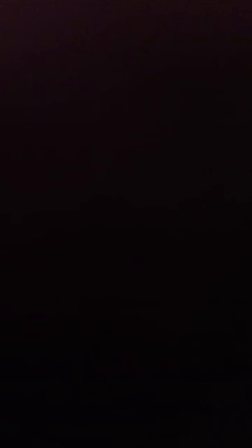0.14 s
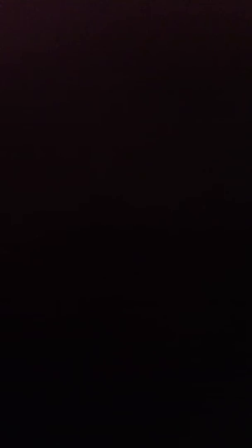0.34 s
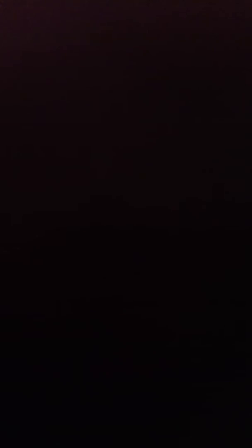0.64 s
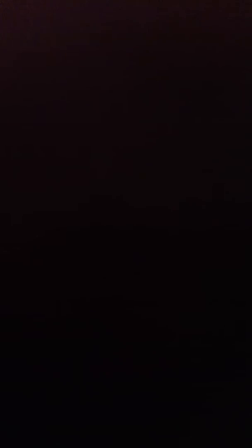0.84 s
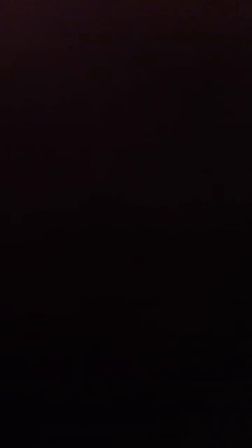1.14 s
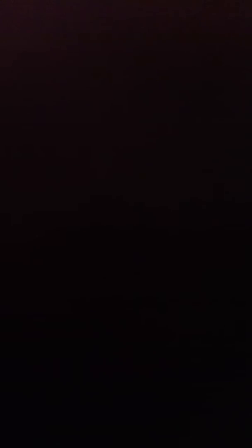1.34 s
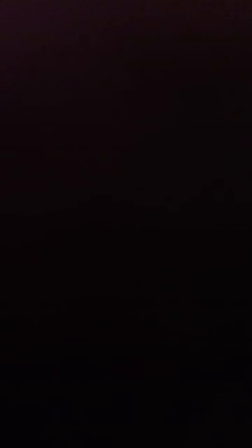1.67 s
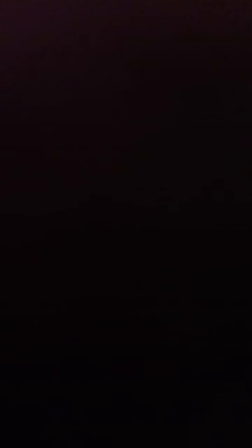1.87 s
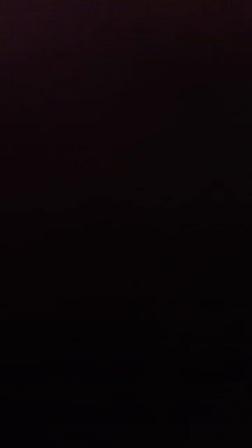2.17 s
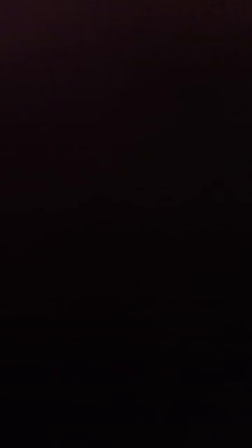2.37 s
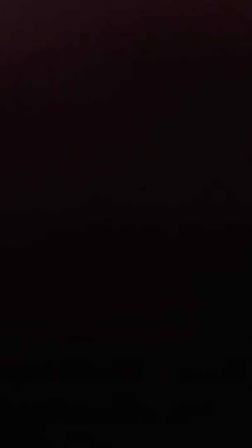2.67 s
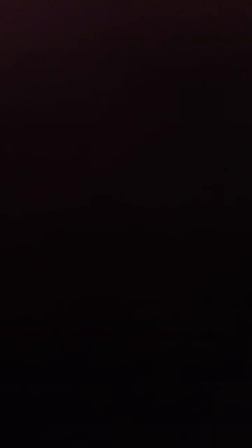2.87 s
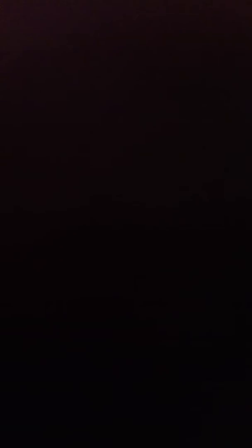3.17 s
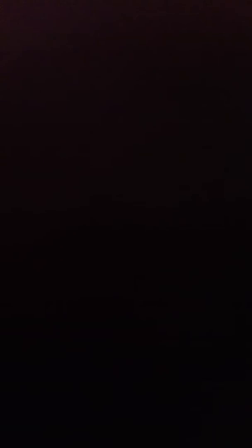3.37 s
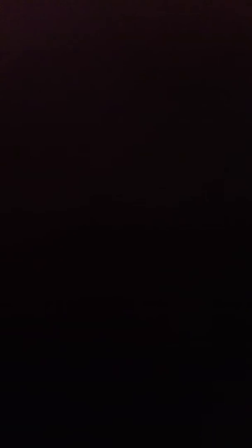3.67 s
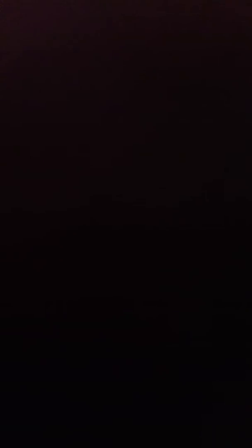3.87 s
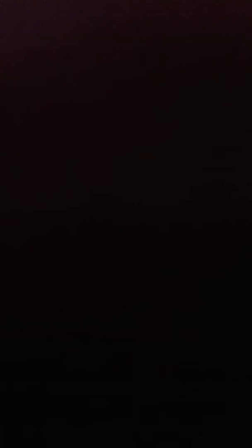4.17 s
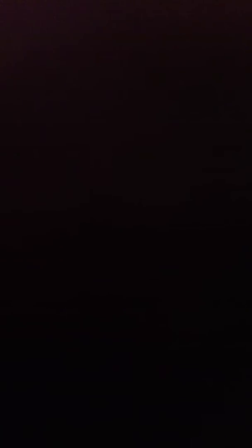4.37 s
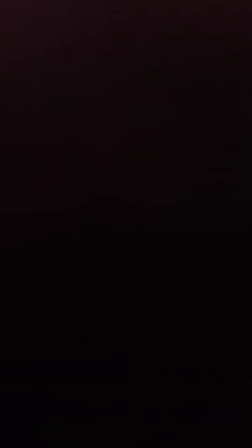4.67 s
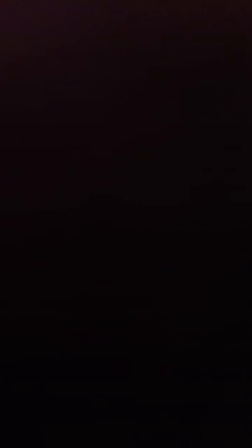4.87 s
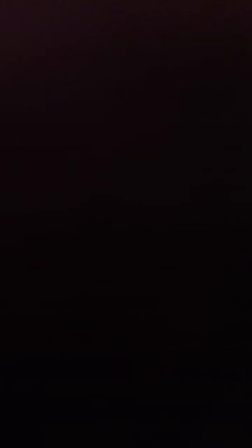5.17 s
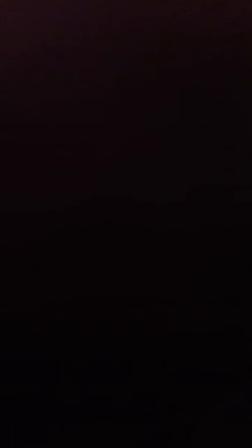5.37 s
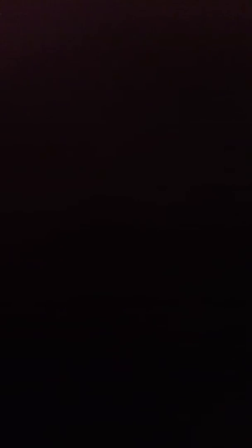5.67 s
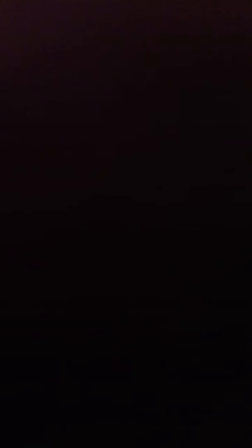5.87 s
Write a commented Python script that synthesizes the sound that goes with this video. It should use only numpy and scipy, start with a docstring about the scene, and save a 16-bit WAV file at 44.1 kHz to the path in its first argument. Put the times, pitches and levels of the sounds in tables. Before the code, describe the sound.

A hollow wooden object is handled close up: soft scuffs, one sharp knock, bumpy dragging and rasping, near quiet, then another thumping scrape fading away.

```python
"""A hollow wooden body, perhaps a drawer, is rubbed and handled close to a small microphone.
Light brushes of a hand come first, then a knock, a long dragging slide with bumps and a shorter shove.
The rub is shaped noise for the hiss, and tiny random catches that shake resonances of the body.
Bumps are brief shudders that ring the body; the knock is noise whose bands rise and decay apart.
A gliding airy hiss and a thin squeak come late; room rumble, microphone hiss and a whine lie below."""
import sys
import numpy as np
from scipy import signal
from scipy.io import wavfile
from scipy.ndimage import uniform_filter1d

SR = 44100
rng = np.random.default_rng(int(sys.argv[2]) if len(sys.argv) > 2 else 0)


def volts_from_db(level):
    """Convert decibel levels to linear amplitude ratios."""
    exponent = np.asarray(level, float) / 20
    return 10 ** exponent


def persist_wave(psi):
    """Save psi, clipped to +-1, as 16-bit WAV."""
    counts = np.round(np.clip(psi, -1, 1) * 32767).astype(np.int16)
    wavfile.write(sys.argv[1], SR, np.atleast_2d(counts).T)


N = 265482


def rms_one(x):
    """Scales to unit rms."""
    return x / np.sqrt(np.mean(x ** 2) + 1e-20)


def at_hz(points, hz):
    """Reads a table of (Hz, value) on a log-frequency axis."""
    table_hz, values = np.transpose(points)
    return np.interp(np.log(hz), np.log(table_hz), values)


def in_time(rows):
    """Columns of a curve, sample by sample; the first column is time in seconds."""
    s, *columns = np.transpose(rows)
    return [np.interp(np.arange(N) / SR, s, column) for column in columns]


def drift(rate_hz):
    """Slow chance with spread 1: noise smoothed twice."""
    r = np.exp(-2 * np.pi * rate_hz / SR)
    run_in = 9000   # samples thrown away while the filter settles
    smooth = signal.lfilter([1], [1, -2 * r, r * r], rng.standard_normal(N + run_in))
    return rms_one(smooth[run_in:])


def resonate(x, hz, width_hz):
    """One resonance with gain 1 on top."""
    r = np.exp(-np.pi * width_hz / SR)
    poles = [1, -2 * r * np.cos(2 * np.pi * hz / SR), r * r]
    return signal.lfilter([(1 - r * r) / 2, 0, (r * r - 1) / 2], poles, x + 1e-18)


# Edges of the sixth-octave bands, in Hz.
BAND_EDGES_HZ = 25 * 2 ** (np.arange(57) / 6)


def bands(gain_at):
    """Sixth-octave bands of noise, run in, each shaped by a gain that may change in time."""
    white = rng.standard_normal((2, N + SR // 2))
    out = np.zeros(N)
    for k, (low, high) in enumerate(zip(BAND_EDGES_HZ, BAND_EDGES_HZ[1:])):
        band_filter = signal.butter(2, [low, high], "band", fs=SR, output="sos")
        band = signal.sosfilt(band_filter, white[k % 2])   # neighbours use separate noises
        out += band[-N:] * gain_at(np.sqrt(low * high))
    return out


def swells(start, hold, db, rise_db_per_s, fall_db_per_s):
    """Level in dB of each event: a rise up to its start, a hold, a fall."""
    late = np.arange(N, dtype=np.float32) / SR - start[:, None]
    rise = rise_db_per_s * np.minimum(late, 0)
    fall = fall_db_per_s * np.maximum(late - hold[:, None], 0)
    return db[:, None] + rise - fall


def joined(*levels_db):
    """Level in dB of unrelated sounds heard together."""
    return 10 * np.log10(np.sum(volts_from_db(np.vstack(levels_db)) ** 2, axis=0) + 1e-20)


# Colour of the room rumble and microphone hiss. Each row: pitch in Hz, relative level in dB per Hz.
AIR_COLOUR = [(15, -61), (25, -14.5), (91, -6.5), (156, -6.5), (240, -11), (306, -8.5), (497, -16),
              (669, -20.5), (725, -21), (876, -19.5), (1060, -23), (1420, -22.5), (1630, -23.5),
              (15600, -29)]
# A faint electronic whine. Each row: pitch in Hz, level in dB.
WHINE_TONES = [(11703, -81)]


def air():
    """Room rumble and microphone hiss as steady shaped noise, and the whine as a sine."""
    whine = sum(np.sqrt(2) * volts_from_db(db) * np.sin(2 * np.pi * hz * np.arange(N) / SR)
                for hz, db in WHINE_TONES)
    noise = rms_one(bands(lambda hz: volts_from_db(at_hz(AIR_COLOUR, hz))))
    return volts_from_db(-56) * noise + whine


# Light brushes and scuffs of the hand. Each row: start in seconds (when it is at full level),
# hold in seconds, hiss in dB, weight on the body in dB, catch on the edge in dB.
HAND_BRUSHES = [(0.049, 0.047, -51.5, -51, -49), (0.17, 0.087, -60.5, -63.5, -63),
                (0.612, 0.18, -61, -61.5, -64), (1.077, 0.0078, -53.5, -50.5, -55),
                (1.174, 0.031, -53, -48, -52.5), (1.368, 0.1, -50, -49.5, -52),
                (1.613, 0.028, -59, -55, -61.5), (1.684, 0.1, -43.5, -45, -48),
                (4.09, 0.011, -58, -63, -58.5), (4.18, 0.027, -53.5, -60, -60), (4.898, .02, -49, -45, -39),
                (5.209, 0.011, -67, -47, -46.5), (5.602, 0.066, -62.5, -59.5, -62),
                (5.817, .01, -55.5, -56.5, -58.5), (5.884, .1, -68, -65, -69)]
BRUSH_RISE_DB_PER_S, BRUSH_FALL_DB_PER_S = 387, 243


def brushes():
    """Hiss, weight and edge levels of each hand brush, all with the same swell."""
    start, hold, hiss_db, weight_db, catch_db = np.transpose(HAND_BRUSHES)
    hiss = swells(start, hold, hiss_db, BRUSH_RISE_DB_PER_S, BRUSH_FALL_DB_PER_S)
    return hiss, hiss + (weight_db - hiss_db)[:, None], hiss + (catch_db - hiss_db)[:, None]


# Moments when a new push sets in at once, in seconds.
JOLTS_S = [1.9545, 3.186, 4.687, 4.785, 5.207]
# The pushes, one list for each. Each row: time in seconds, speed as hiss in dB,
# weight on the body in dB, favoured panel pitch in Hz. At a jolt, the jolt sets the time.
PUSH_CURVES = [
    [(0.0, -99, -99, 750), (1.93, -99, -99, 750)],
    [(1.97, -27.5, -30, 790), (2.02, -57, -37.5, 700), (2.07, -45.5, -39, 640), (2.13, -44, -41, 740),
     (2.264, -39, -37.5, 860), (2.42, -48, -37.5, 655), (2.57, -45, -37.5, 770), (2.664, -39, -37, 660),
     (2.704, -39.5, -32, 580), (2.84, -36, -26.5, 610), (2.91, -33.5, -29.5, 633), (2.972, -34, -25, 700),
     (3.03, -35.5, -33.5, 750), (3.08, -34.5, -38, 1000), (3.17, -38, -34.5, 920)],
    [(3.2, -36, -30, 880), (3.244, -37, -30.5, 880), (3.322, -38, -35, 810), (3.38, -33.5, -32, 985),
     (3.45, -37.5, -34.5, 863), (3.486, -37, -30.5, 835), (3.52, -38.5, -35.5, 774),
     (3.58, -35.5, -32, 930), (3.67, -36.5, -32.5, 770), (3.83, -40.5, -34, 705), (3.94, -40, -32.5, 810),
     (4.0, -47.5, -38, 825), (4.068, -54.5, -45, 630), (4.148, -73, -57, 615), (4.3, -71, -73, 613),
     (4.54, -70, -86, 670), (4.616, -68, -58, 650), (4.67, -71, -59, 620)],
    [(4.7, -57.5, -40.5, 585), (4.745, -62, -48, 590), (4.76, -51, -59, 580)],
    [(4.8, -44.5, -30, 570), (4.83, -43.5, -32.5, 710), (4.91, -38.5, -32, 810), (4.97, -41.5, -34, 672),
     (5.0, -44.5, -38, 650), (5.04, -46.5, -41, 646), (5.074, -52, -34.5, 630), (5.114, -54, -31.5, 640),
     (5.19, -56, -41.5, 700)],
    [(5.22, -58, -34.5, 706), (5.288, -84, -46, 630), (5.42, -94, -64.5, 622), (5.55, -99, -70, 646)],
]


def pushes(rise_s):
    """Joins the curves of successive pushes; each new one sets in at its jolt."""
    parts = [np.array(part, float) for part in PUSH_CURVES]
    for before, after, s in zip(parts, parts[1:], JOLTS_S):
        before[-1, 0] = s
        after[0, 0] = s + rise_s
    return in_time(np.concatenate(parts))


# Heaves that wake the low boom. Each row: start in seconds (when it is at full level),
# hold in seconds, level in dB, favoured pitch in Hz.
BOOM_HEAVES = [(0.613, .015, -54, 117), (1.657, 0.022, -49, 144), (1.803, 0.026, -56, 147),
               (1.982, 0.099, -36.5, 156), (2.137, 0.24, -43, 158), (2.38, 0.099, -41, 200),
               (2.703, 0.062, -38.5, 200), (2.79, .05, -52, 123), (2.935, 0.2, -40.5, 125),
               (3.198, 0.016, -43, 200), (3.365, 0.047, -42, 117), (3.512, 0.038, -63, 169),
               (3.81, .03, -44.5, 117), (3.93, .06, -43, 118), (4.05, 0.018, -40.5, 120),
               (4.16, 0.24, -50, 157), (4.608, 0.017, -45.5, 171), (4.716, .03, -44, 155),
               (4.786, 0.022, -29.5, 125), (4.936, .06, -31, 123), (5.063, 0.16, -41, 200),
               (5.245, 0.066, -48.5, 175), (5.46, .08, -58, 165)]


def heaves():
    """Level of each heave, and the pitch favoured by the strongest one at each moment."""
    start, hold, db, hz = np.transpose(BOOM_HEAVES)
    level_db = swells(start, hold, db, rise_db_per_s=700, fall_db_per_s=226)
    return level_db, hz[level_db.argmax(axis=0)]


def grit(per_s, spread_db):
    """Tiny random catches of a rough surface."""
    sizes = volts_from_db(spread_db * np.minimum(rng.exponential(1, N), 5)) * rng.choice([-1, 1], N)
    return sizes * (rng.random(N) < per_s / SR)


def shaken(modes, per_s, patchy_db, near_hz=None, off_db=0):
    """Catches drive all modes; each swells on its own and loses off_db an octave from near_hz."""
    force = grit(per_s, spread_db=2.5)
    out, power = 0, 0
    for k, (hz, width, db) in enumerate(modes):
        octaves_off = np.abs(np.log2(hz / near_hz)) if off_db else 0
        gain = volts_from_db(db - off_db * octaves_off)
        patches = volts_from_db(patchy_db * drift(5.7))
        out += (-1) ** k * gain * patches * resonate(force, hz, width)
        power += gain ** 2 * width
    return rms_one(out / np.sqrt(power))   # a change of pitch leaves the loudness even


# Colour of the rub's hiss. Each row: pitch in Hz, relative level in dB per Hz.
HISS_COLOUR = [(1470, -35), (2500, -3.5), (3370, -1), (3780, -2), (4330, -1), (5570, -7.5), (7170, -11.5),
               (9950, -19.5), (15500, -43)]


def surface_hiss(top_db):
    """Rasp of the surface as noise; top_db tilts it above 4500 Hz, and each band comes and goes a little."""
    def gain(hz):
        """Gain of one band in time."""
        tilt_db = (top_db + 9.5) * np.clip(np.log2(hz / 4500), 0, 1.3)
        return volts_from_db(at_hz(HISS_COLOUR, hz) + tilt_db + 0.29 * drift(15.0))
    return rms_one(bands(gain))


# Resonances of the edge. Each row: pitch in Hz, width in Hz, relative level in dB.
EDGE_MODES = [(1530, 330, -1.5), (1788, 42, 7), (1940, 57, 1.5), (2113, 67, 3), (2318, 215, -2.5),
              (2615, 71, 0), (2864, 150, -7)]


def edge():
    """Dense catches ring the edge."""
    return shaken(EDGE_MODES, per_s=6000, patchy_db=0.0)


# Resonances of the panels. Each row: pitch in Hz, width in Hz, relative level in dB.
PANEL_MODES = [(482.7, 36, -3), (534, 27, -2.5), (590, 27, -2), (620.4, 35, -3), (702, 21, -5.5),
               (767.6, 11.4, -2.5), (823, 26, -6.5), (906.5, 35.5, -3.5), (970, 91, -12.5),
               (1000.5, 11.6, -2), (1091, 40, -2), (1191, 9.8, 0), (1267, 57, -5), (1415, 44, -4),
               (1432, 34, -6)]


def panels(near_hz):
    """Catches shake the panels, most strongly near the favoured pitch."""
    return shaken(PANEL_MODES, per_s=4000, patchy_db=3.0, near_hz=near_hz, off_db=9.5)


# Resonances of the hollow. Each row: pitch in Hz, width in Hz, relative level in dB.
HOLLOW_MODES = [(279, 27.6, -6.5), (321.2, 6.2, -6), (353, 4.9, -1), (385, 16.6, -6), (417, 74, -10)]


def hollow(near_hz):
    """Sparser catches shake the hollow, most strongly near the favoured pitch."""
    return shaken(HOLLOW_MODES, per_s=2000, patchy_db=-0.34, near_hz=near_hz, off_db=9.0)


# Low resonances of the body. Each row: pitch in Hz, width in Hz, relative level in dB.
BOOM_MODES = [(108.2, 13, -2.5), (121.3, 32.7, 0), (152.3, 10.2, -1.5), (156.8, 9.2, 0), (200, 53, -4.5)]


def boom(near_hz):
    """The sparsest catches shake the low modes, with the bass below 92 Hz taken off."""
    low = shaken(BOOM_MODES, per_s=1000, patchy_db=1.0, near_hz=near_hz, off_db=21.5)
    return signal.sosfilt(signal.butter(4, 92, "high", fs=SR, output="sos"), low)


def rubbing():
    """Surface hiss, edge, panels, hollow and boom follow speed and weight of the stroke."""
    even_db = -35   # the laws below are stated for a stroke of this level
    push_db, load_db, push_hz = pushes(rise_s=0.0023)
    brush_db, touch_db, catch_db = brushes()
    heave_db, heave_hz = heaves()

    hiss_db = joined(push_db, brush_db)
    panel_db = joined(load_db, touch_db)
    speed, weight = hiss_db - even_db, panel_db - even_db
    by_hand = 1 - volts_from_db(load_db - panel_db) ** 2   # share of the weight that comes from brushes
    # a hand favours panels near 700 Hz
    panel_hz = np.where(load_db > touch_db.max(axis=0), push_hz, 700)

    # the edge follows speed, and weight a little
    edge_db = joined(-40 - even_db + push_db + 0.23 * (load_db - push_db), catch_db)
    # lighter strokes are brighter; a stroke that catches on the edge is duller on top
    catching_db = np.maximum(edge_db - hiss_db + 4, 0)
    top_db = np.minimum(-8.5 - 0.36 * speed - 0.5 * catching_db, 0)

    # the hollow follows weight; a hand wakes it less than a push does
    hollow_db = -38 - 4 * by_hand + 1.04 * weight
    # its favoured pitch leans from 350 Hz towards the pitch of the bumps nearby
    bump_hz = in_time(BODY_BUMPS)[1]
    hollow_hz = 350 * (bump_hz / 350) ** 0.67

    # a steady boom under the weight of a push favours 200 Hz, unless a heave is stronger
    steady_db = -50.5 + 1.38 * (load_db - even_db)
    boom_db = joined(steady_db, heave_db)
    boom_hz = np.where(steady_db > heave_db.max(axis=0), 200, heave_hz)
    boom_hz = uniform_filter1d(boom_hz, size=1500)

    judder = drift(20.0)   # the stroke is uneven: all parts but the boom flutter together
    out = volts_from_db(hiss_db + 0.38 * judder) * surface_hiss(top_db)
    out += volts_from_db(edge_db + 0.17 * judder) * edge()
    out += volts_from_db(panel_db + 0.3 * judder) * panels(panel_hz)
    out += volts_from_db(hollow_db + 0.2 * judder) * hollow(hollow_hz)
    return out + volts_from_db(boom_db) * boom(boom_hz)


# Bumps that jolt the hollow. Each row: start in seconds, strength in dB (the shudder peaks 7 dB lower),
# shudder pitch in Hz, swell time in seconds (never played shorter than 0.002).
BODY_BUMPS = [(1.345, -45, 488, 0.016), (1.47, -44.5, 387, 0.0061), (1.721, -39, 387, 0.012),
              (1.759, -44, 426, 0.01), (2.041, -24, 477, 0.0061), (2.377, -27, 370, 0.004),
              (2.398, -29.5, 376, 0.007), (2.695, -20.5, 313, 0.0066), (2.722, -21, 336, 0.0079),
              (2.761, -15, 252, 0.0023), (2.788, -38, 275, 0.0042), (2.819, -15, 268, 0.0021),
              (2.848, -17, 275, 0.0057), (2.88, -14, 376, 0.0031), (2.907, -12.5, 317.5, 0.01),
              (2.939, -12, 348, 0.0046), (2.969, -20.5, 410, 0.0075), (2.989, -16, 340, 0.0025),
              (3.019, -23, 364, 0.0017), (3.189, -14.5, 357, 0.0055), (3.217, -15.5, 376, 0.0023),
              (3.267, -27, 392, 0.0095), (3.308, -24.5, 392, 0.0067), (3.748, -25, 364, 0.011),
              (3.818, -28, 353, 0.0062), (3.913, -22, 341, 0.0074), (4.62, -43, 247, 0.0085),
              (4.692, -47, 308, 0.0065), (4.78, -15.5, 363, 0.005), (4.808, -14.5, 368, 0.0044),
              (4.843, -30, 373, 0.0042), (4.9, -20.5, 378, 0.0024), (4.951, -23, 374, 0.0089),
              (5.065, -25, 348.6, 0.018), (5.088, -22.5, 354, 0.0088), (5.109, -21.5, 353, 0.012),
              (5.129, -31, 360, 0.013), (5.158, -29, 357, 0.009), (5.214, -24.5, 366.5, 0.0085),
              (5.246, -32.5, 385, 0.0073), (5.285, -38, 358, 0.009)]


def bumps():
    """Each bump is a brief shudder that swells and fades; hollow and panels ring on after it."""
    shudder = np.zeros(N)
    phases = rng.random(len(BODY_BUMPS))   # in cycles
    age = np.arange(int(.08 * SR)) / SR
    for (s, strength_db, hz, swell_s), phase in zip(BODY_BUMPS, phases):
        x = age / max(swell_s, .002)
        swell = x * np.exp(1 - x)   # peaks at 1
        start = int(s * SR)
        tone = np.sin(2 * np.pi * (hz * age + phase))
        shudder[start:start + len(age)] += volts_from_db(strength_db - 7.0) * swell * tone
    ring = sum(volts_from_db(db) * resonate(shudder, hz, width) for hz, width, db in HOLLOW_MODES + PANEL_MODES)
    return shudder + volts_from_db(4.0) * ring


# Colour of the knock. Each row: pitch in Hz, relative level in dB per Hz.
KNOCK_COLOUR = [(47, -54), (80, -30), (252, -1), (374, -10.5), (1100, -2), (1600, -7), (2040, -4),
                (2430, -7.5), (11400, -33), (14500, -54), (15500, -78)]
# How long the knock rings. Each row: pitch in Hz, time to fall by 60 dB in seconds.
KNOCK_DECAY = [(100, .2), (250, 0.53), (600, 0.59), (1500, 0.25), (4000, 0.3), (10000, 0.032)]


def knock():
    """A crunching blow: the treble cracks first, the lows build later and decay at their own pace."""
    age = np.maximum(np.arange(N) / SR - JOLTS_S[0], 0)   # it falls on the first jolt
    # about the rms of all bands before rise and decay
    loudness = np.sqrt(sum(volts_from_db(at_hz(KNOCK_COLOUR, hz)) ** 2 * hz * .23 / SR for hz in BAND_EDGES_HZ))

    def envelope(hz):
        """Rise and decay of one band."""
        crack = (age > 0) * np.clip(0.17 * np.log2(hz / 700), 0, 1)   # share that speaks at once
        rise = np.minimum(crack + age * hz / 10, 1)   # a full rise takes 10 cycles
        return rise * volts_from_db(at_hz(KNOCK_COLOUR, hz) - 60 * age / at_hz(KNOCK_DECAY, hz))
    return volts_from_db(-21) / loudness * bands(envelope)


# An airy hiss that slides down. Each row: time in seconds, centre pitch in Hz,
# level in dB of the noise before the carrier tone, which takes 3 dB off.
WHISK_GLIDE = [(4.97, 9200, -82), (5.03, 8800, -54), (5.10, 7770, -55.5), (5.18, 7400, -53.5),
               (5.23, 7030, -50.5), (5.26, 7100, -66), (5.31, 7070, -77)]


def whisk():
    """Low noise times a gliding tone makes a broad band whose centre glides."""
    hz, db = in_time(WHISK_GLIDE)
    lowpass = signal.butter(2, 800, fs=SR, output="sos")
    spread = rms_one(signal.sosfilt(lowpass, rng.standard_normal(N)))
    return volts_from_db(db) * spread * np.sin(2 * np.pi * np.cumsum(hz) / SR)


def squeak():
    """A faint thin squeak: noise twice through a narrow resonance, swelling like a brush."""
    hz, width_hz = 2630, 55
    tone = resonate(resonate(rng.standard_normal(N), hz, width_hz), hz, width_hz)
    start, hold, db = np.array([5.4]), np.array([.025]), np.array([-65])   # s, s, dB
    level_db = swells(start, hold, db, BRUSH_RISE_DB_PER_S, BRUSH_FALL_DB_PER_S)[0]
    return volts_from_db(level_db) * rms_one(tone)


def scene():
    """All sources at one microphone."""
    return (air() + rubbing() + bumps() + knock() + whisk() + squeak())[None]


def roll_off(x):
    """The treble ends steeply here."""
    return signal.sosfilt(signal.butter(12, 15800, fs=SR, output="sos"), x)


def record(dry):
    """The small microphone drops the deepest bass and the last treble."""
    heard = signal.sosfilt(signal.butter(3, 40, "high", fs=SR, output="sos"), dry)
    heard = signal.sosfilt(signal.butter(2, 15500, fs=SR, output="sos"), heard)
    return roll_off(heard)


dry = scene()
out = record(dry)
persist_wave(out)
```